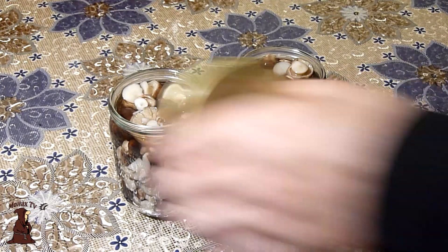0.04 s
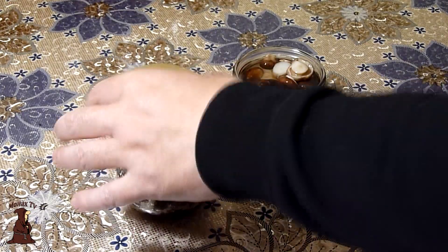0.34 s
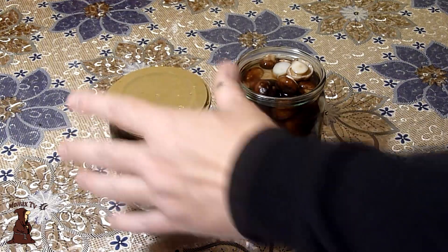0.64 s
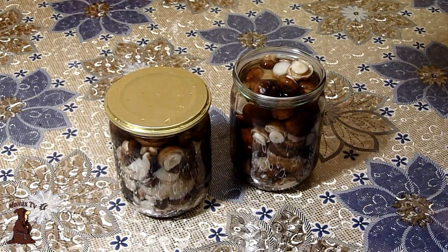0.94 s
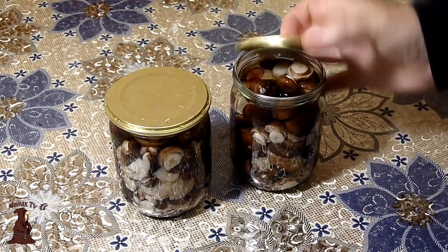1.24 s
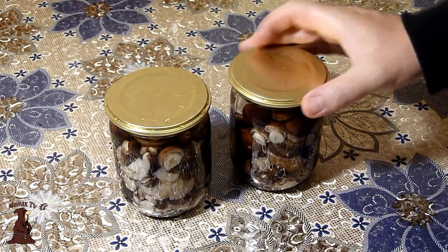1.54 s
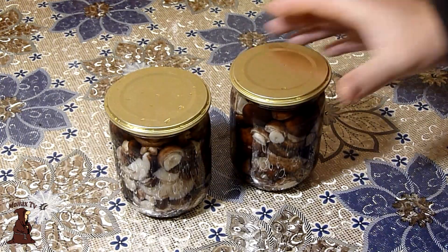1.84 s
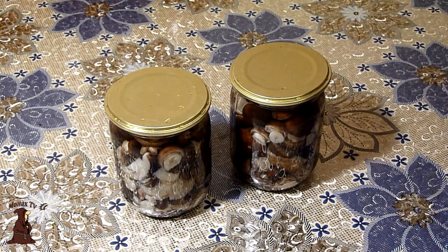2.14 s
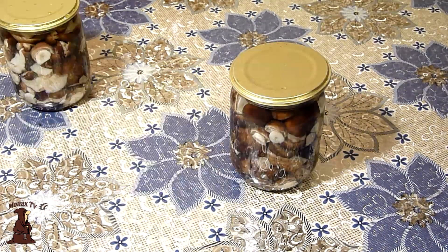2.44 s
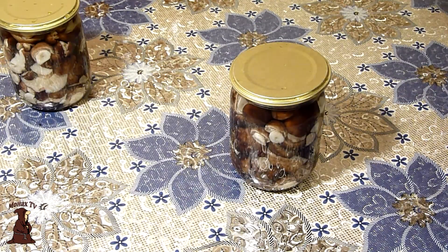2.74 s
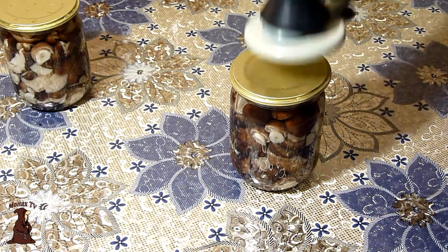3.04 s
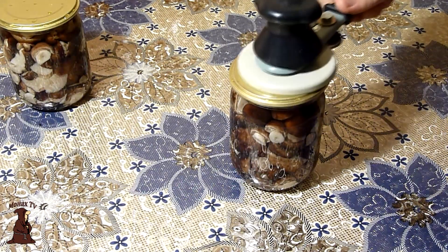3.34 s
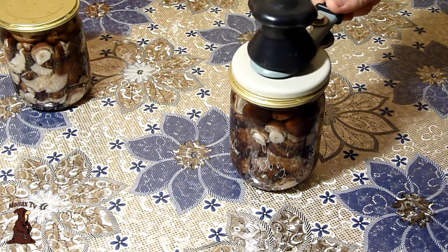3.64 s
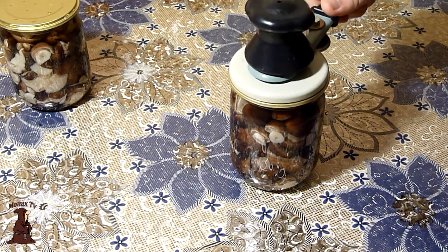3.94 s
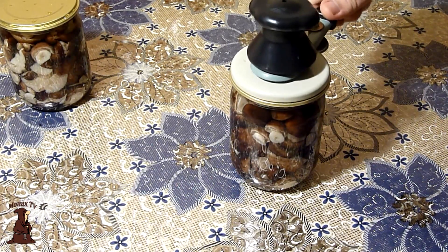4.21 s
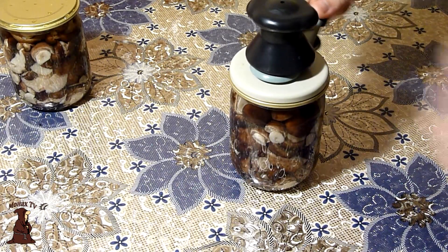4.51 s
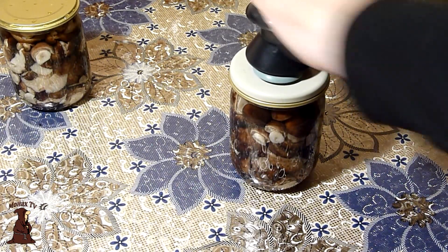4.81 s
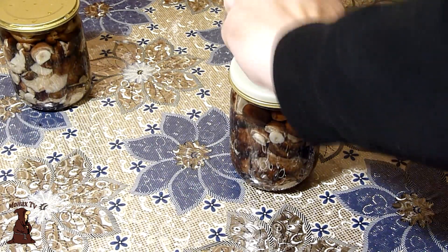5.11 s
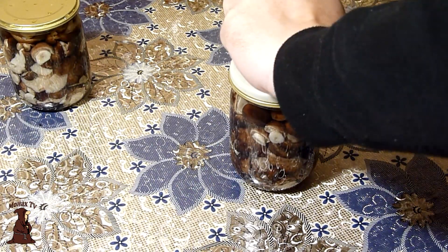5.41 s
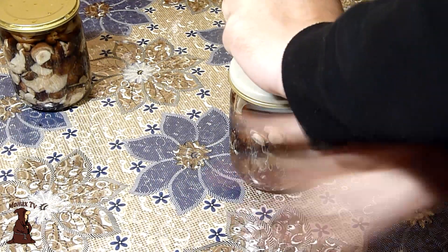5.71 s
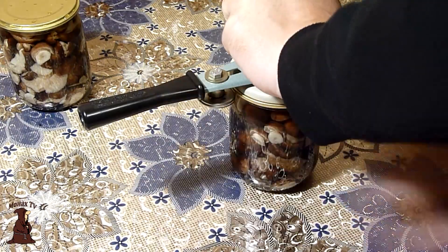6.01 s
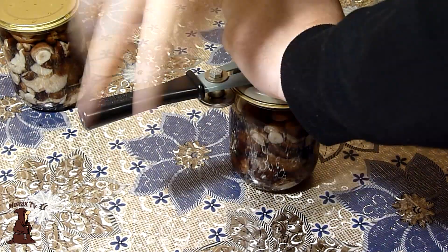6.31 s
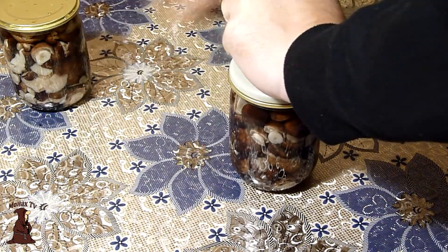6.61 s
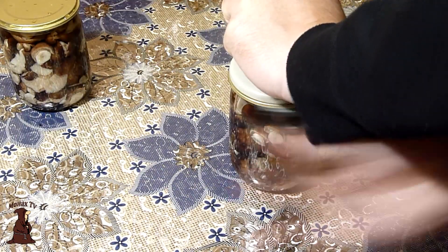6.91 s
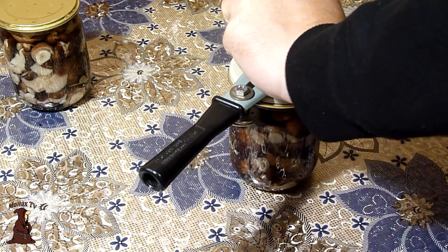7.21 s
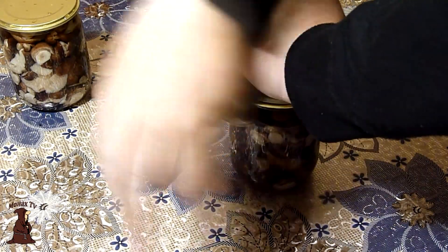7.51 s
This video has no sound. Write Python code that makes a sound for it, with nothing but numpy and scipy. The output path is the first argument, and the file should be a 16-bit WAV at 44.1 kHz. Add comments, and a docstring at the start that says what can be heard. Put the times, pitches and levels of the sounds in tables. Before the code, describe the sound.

A tin lid clangs onto a filled glass jar and is pressed home with a sharp ringing snap. A second lid clatters onto another jar, while hands and jars thump a cloth-covered table. A hand seamer clanks onto that lid, clicks as it is tightened, then rubs and scrapes quietly around the rim with a few clacks. The sounds are close, with a short kitchen echo over a soft steady hiss.

```python
"""Tin lids clang as they are dropped on two filled glass jars, one after the other, and pressed home.
A hand seamer, the tool that closes a lid's rim, is set on the second jar, tightened and cranked;
its roller rubs and clicks round the rim. Struck metal rings at its own tones; sliding parts hiss.
Hands and jars thump the cloth-covered table, and the small kitchen echoes over a soft steady hiss."""
import sys
import numpy as np
from scipy import signal
from scipy.fft import rfft, irfft, next_fast_len
from scipy.io import wavfile
from scipy.ndimage import uniform_filter1d

SR = 44100
rng = np.random.default_rng(int(sys.argv[2]) if len(sys.argv) > 2 else 0)


def file_out(sig):
    """Save sig as 16-bit WAV at sys.argv[1]."""
    # one column per channel
    cols = np.atleast_2d(sig).T
    # limit, then scale
    lim = np.clip(cols, -1, 1)
    pcm = np.round(lim * 32767).astype(np.int16)
    wavfile.write(sys.argv[1], SR, pcm)


N = 342216
BLOW_TIME = np.arange(SR // 2) / SR   # the half second that one blow is given


def from_db(db):
    """Turn decibels into a gain."""
    return 10 ** (np.asarray(db) / 20)


def rms_one(x):
    """Scale a sound to an average power of 1."""
    return x / np.sqrt(np.mean(x ** 2) + 1e-20)


def burst_one(x, size=220):
    """Scale a sound so that its loudest `size` samples have an average power of 1."""
    return x / np.sqrt(uniform_filter1d(x ** 2, size, mode="constant").max() + 1e-20)


def at_hz(points, hz):
    """Read a curve between its points, with octaves evenly spaced."""
    points = np.array(points)
    return np.interp(np.log(hz), np.log(points[:, 0]), points[:, 1])


def band(x, low, high, order=2):
    """Keep what lies between two frequencies."""
    return signal.sosfilt(signal.butter(order, [low, high], "band", fs=SR, output="sos"), x)


def dying(t60, t=BLOW_TIME):
    """A fade that loses 60 dB in t60 seconds, the ring time."""
    return np.exp(-np.log(1000) * t / t60)


def add(track, s, sound):
    """Mix a sound in at s seconds."""
    start = int(s * SR)
    track[start:start + len(sound)] += sound[:N - start]


def place(x, pan_db):
    """Share a sound between left and right; positive is to the left."""
    return x * from_db([[pan_db / 2], [-pan_db / 2]])


def spread(mid, side, width_db):
    """Make wide stereo: side is added to mid on the left and taken from it on the right."""
    return mid + from_db(width_db) * side * np.array([[1], [-1]])


def flutter(per_s):
    """A random wavering, about 1 in size."""
    return rms_one(np.interp(np.arange(N) / SR * per_s, np.arange(8000), rng.standard_normal(8000)))


def noise(spectrum, narrow_db):
    """Wide stereo noise with the given spectrum."""
    # stereo width of the air: f/Hz, side over mid/dB
    air_width = [(60, -8), (200, -4.5), (380, 0.5), (700, 3.5), (1290, 5), (2380, 4.5), (4400, 2),
                 (8120, 0), (15000, -3)]
    size = next_fast_len(N, real=True)
    hz = np.maximum(np.arange(size // 2 + 1) * SR / size, 1)
    inside = (hz > spectrum[0][0]) & (hz < spectrum[-1][0])
    mid, side = rfft(rng.standard_normal((2, size))) * from_db(at_hz(spectrum, hz)) * inside
    pair = irfft(spread(mid, side, at_hz(air_width, hz) - narrow_db), size)[:, :N]
    return pair / pair.mean(axis=0).std()


def room_air():
    """A soft steady hiss, strongest in the bass."""
    # spectrum of the hiss: f/Hz, level/dB
    spectrum = [(15, -53), (25, -9), (35, -15), (48, -8), (66, 2), (82, 0), (145, 1), (190, 1.5),
                (256, -1.5), (394, -1.5), (677, -5.5), (1190, -8.5), (2000, -13), (3820, -14.5),
                (16000, -23.5)]
    return from_db(-53.5) * noise(spectrum, narrow_db=-1.6)


def knock(hz, contact_s, cycles, rattle_db, width):
    """A padded blow: a short low tone with a rattle around it."""
    t = BLOW_TIME
    push = (1 - np.exp(-t / contact_s)) * dying(cycles / hz + 2 * contact_s)
    rattle = rms_one(band(rng.standard_normal(len(t)), hz / (1 + width), hz * (1 + width)))
    return burst_one(push * (np.sin(2 * np.pi * hz * t) + from_db(rattle_db) * rattle), size=660)


def table_thumps():
    """Hands and jars give short low knocks and set the table top booming."""
    # a hand leans or lands on the table, through jar and cloth: t/s, level/dB, f/Hz, boom/dB
    hand_thumps = [(.088, -51, 122, -56), (.385, -42.5, 126, -46), (1.076, -34, 128, -55),
                   (1.352, -34, 130, -45), (1.732, -37.5, 139, -41.5), (2.122, -36, 127.5, -41.5),
                   (2.903, -50.5, 200, -58.5), (3.888, -33.5, 166, -57), (5.871, -45.5, 270, -59.5),
                   (7.187, -36.5, 211, -49.5)]
    # a jolted jar knocks on its base: t/s, level/dB, f/Hz
    jar_knocks = [(.232, -41, 200), (.313, -42.5, 193), (0.497, -42, 308), (1.214, -32, 388),
                  (1.363, -38.5, 316), (1.419, -36, 460), (2.1, -42.5, 345), (2.63, -53.5, 256),
                  (3.243, -43.5, 355), (3.896, -37.5, 340), (4.059, -32.5, 369), (4.088, -38, 351),
                  (5.335, -46, 587), (6.434, -30.5, 366), (6.47, -33.5, 398), (7.52, -39, 354)]
    table_hz, ring_s, swell_s = 55.7, 0.86, 0.033
    knocks, booms, t = np.zeros(N), np.zeros(N), BLOW_TIME
    envelope = (1 - np.exp(-t / swell_s)) * dying(ring_s)
    boom = burst_one(np.sin(2 * np.pi * table_hz * t) * envelope, size=1800)
    for s, db, hz, boom_db in hand_thumps:
        add(knocks, s, from_db(db) * knock(hz, contact_s=0.01, cycles=9.1, rattle_db=-2.5, width=0.58))
        add(booms, s, from_db(boom_db) * boom)
    for s, db, hz in jar_knocks:
        jar = knock(hz, contact_s=0.0027, cycles=15.4, rattle_db=-4, width=0.44)
        table_thud = knock(hz=114.4, contact_s=0.01, cycles=13.4, rattle_db=-3, width=0.68)
        add(knocks, s, from_db(db) * (jar + from_db(-13.5) * table_thud))
        add(booms, s, from_db(db - 31) * boom)
    return from_db(-0.5) * knocks, from_db(-2) * booms


def strikes(contacts, tones, colour_db, crack_db, crack_hz, ring_db, split):
    """Struck metal sounds its own tones: briefly while the parts touch, then ringing freely."""
    # body, clang, bright and tick ranges, each with a level in colour_db: low f/Hz, high f/Hz
    ranges = [(250, 1000), (1000, 2500), (2500, 7000), (7000, 16000)]
    out, t = np.zeros(N), BLOW_TIME
    hz, tone_db, t60 = np.transpose(tones)
    # uneven support splits each tone into three close ones that beat
    triplets = hz * (1 + split * np.array([[-1], [0], [1]]) * rng.uniform(.5, 1.5, (3, len(hz))))
    waves = sum(np.sin(2 * np.pi * (f[:, None] * t + rng.random((len(f), 1)))) for f in triplets)
    t60 = np.minimum(t60, 2500 / hz)   # ring time is at most 2500 cycles
    free = waves * np.array([dying(ring_s) for ring_s in t60])
    grip = (hz[:, None] / 1500) ** .35   # touching stops high tones sooner
    octaves = np.log2(ranges).mean(axis=1) - np.log2(1580)
    for s, level_db, brightness, contact_s, free_db in contacts:
        age = np.minimum(t / contact_s, 20)
        shares = from_db(tone_db + 2 * rng.standard_normal(len(hz)))
        shares /= np.linalg.norm(shares)
        # the parts chatter, which fills the gaps between the tones
        crack = from_db(crack_db) * band(rng.standard_normal(len(t)), 420, crack_hz) * np.exp(-age)
        blow = shares @ (waves * np.exp(-age * grip) + from_db(free_db + ring_db) * free) + crack
        # a harder contact tilts the sound towards the treble
        range_db = level_db + np.array(colour_db) + brightness * octaves
        for db, edges in zip(range_db, ranges):
            add(out, s, from_db(db) * burst_one(band(blow, *edges, order=5)))
    return out


def first_lid():
    """A tin lid bounces loose on the glass, then rings at other tones as it is pressed home."""
    # lid meets jar: t/s, level/dB, brightness/(dB per octave), contact time/s, free ring/dB
    drops = [(0.2305, -17, -0.2, 0.0082, -8), (0.2367, -18.5, 2, 0.018, 2),
             (0.311, -23.5, -0.5, 0.0083, -23), (0.3168, -15.5, -1, 0.0098, -37),
             (0.3215, -21.5, -1, 0.0087, -39)]
    presses = [(0.427, -21, -1.5, 0.0063, -34), (0.4625, -44, -1, .005, -19),
               (0.4963, -10, -0.04, 0.0063, -20), (0.592, -42, 7.5, 0.013, -5), (0.673, -59, 8, .003, -22)]
    # the lid's tones, loose and seated on the jar: f/Hz, level/dB, ring time/s
    loose = [(479, -18.5, 0.22), (761, -11, 0.32), (1474, 5.5, 0.2), (1557, 6.5, 0.21), (1846, -10, 0.41),
             (2030, -5.5, 0.39), (2300, -24, 0.35), (2220, 0, 0.15), (3060, -8, 0.15), (3280, 1, 0.045),
             (3526, -6, 0.12), (4270, -16, 0.16), (3970, -7, 0.28), (4410, -7.5, 0.34), (5350, -14.5, 0.25),
             (5600, -32, 0.18), (7400, -19, 0.33), (9600, -21, 0.16), (11300, -14.5, 0.17),
             (13900, -16, 0.14)]
    seated = [(498, -9, 0.61), (567, -10, 0.49), (742, -9, 0.51), (1090, -9.5, .45), (1208, -5, 0.52),
              (1517, -7.5, 0.24), (1552, 3, 0.28), (2955, -6, .29), (3260, -7.5, .28), (4470, -8.5, .25),
              (4570, -17, .22), (5800, -11, .17), (7660, -17, 0.12), (9540, -13, .1), (11200, -12, .09)]
    dropped = strikes(drops, loose, colour_db=(-9, 0, -4.5, -14),
                      crack_db=-4, crack_hz=12100, ring_db=2, split=0.0091)
    pressed = strikes(presses, seated, colour_db=(-5.5, -1.5, -10.5, -17.5),
                      crack_db=-14.5, crack_hz=11100, ring_db=-17, split=0.0044)
    return from_db(1) * dropped + from_db(-1.26) * pressed


def sliding(slides, width, grain_db, slips_per_s):
    """Dry, hard surfaces slide: swells of grainy hiss in a band whose width is a share of the pitch."""
    out, t = np.zeros(N), BLOW_TIME
    for s, half_s, hz, db in slides:
        hiss = rms_one(band(rng.standard_normal(len(t)), hz * (1 - width / 2), hz * (1 + width / 2)))
        swell = np.exp(-((t - t.mean()) / half_s) ** 2 / 2)
        add(out, s - t.mean(), from_db(db) * hiss * swell)
    return out * from_db(grain_db * flutter(slips_per_s))


def lid_scrapes():
    """The lids and the seamer's chuck, the part that grips a lid, scrape briefly."""
    # scrapes: middle t/s, half length/s, f/Hz, level/dB
    slides = [(.275, 0.02, 3770, -31), (.40, 0.034, 11300, -48), (1.235, 0.01, 5470, -34.5),
              (1.50, .03, 12000, -50.5), (1.72, 0.012, 10500, -52), (3.31, 0.075, 11900, -58.5),
              (5.034, 0.028, 6050, -52), (5.038, 0.03, 12700, -56), (5.50, 0.012, 13700, -52)]
    return from_db(-0.5) * sliding(slides, width=0.66, grain_db=2.5, slips_per_s=620)


def second_lid():
    """The other lid clatters onto its jar and is knocked once it is seated."""
    # lid meets jar: t/s, level/dB, brightness/(dB per octave), contact time/s, free ring/dB
    drops = [(1.1542, -17.5, -5, 0.0072, -11), (1.2132, -19, 2.5, 0.0072, -7), (1.255, -35.5, 5, .007, -29),
             (1.344, -42.5, 6, .005, -29), (1.4182, -31.5, 0, .0035, -36), (1.4788, -46, 6, .005, -32),
             (1.518, -45.5, -4, .0043, -21), (1.5752, -47, 5, 0.0018, -34), (1.662, -45, 0, 0.0017, -20)]
    knocks = [(1.712, -46, -7, 0.007, 4), (1.725, -35.5, -6.5, .009, -3), (2.497, -50, 4, .0055, -12),
              (3.213, -26, 0.7, 0.0046, 2.5), (3.2255, -28.5, -0.5, .012, -21),
              (3.241, -27.5, -1.5, 0.0034, -29), (3.306, -47, 4, 0.0068, -16),
              (3.507, -53.5, 6.5, .0035, -14)]
    # the lid's tones, loose and seated on the jar: f/Hz, level/dB, ring time/s
    loose = [(408, -14, 0.15), (687, -3.5, 0.13), (764, 3, 0.31), (822, 5, 0.26), (1245, 3, 0.25),
             (1520, -3, 0.099), (1601, -5.5, 0.5), (2006, -3.5, 0.57), (2288, 1.5, 0.24), (2440, -12, .33),
             (2947, -0.5, 0.22), (3288, -1.5, 0.24), (4260, -15, 0.17), (4510, -1.5, 0.19),
             (4530, -6, 0.098), (5280, -8, 0.078), (5420, -8.5, 0.17), (5670, -14, .18), (6820, -9, 0.094),
             (8140, -8, .13), (9270, -7, 0.12), (11600, -4, .13), (12300, -17, .13)]
    seated = [(426, -25, .3), (735, -19, 0.16), (1414, 3, 0.26), (1430, -7, 0.23), (1550, 2, 0.076),
              (1830, -8, 0.22), (2046, 1, 0.048), (2240, -13, 0.23), (2890, -12, 0.42), (3780, -6, 0.073),
              (4930, -10.5, 0.38), (6000, -24, .17), (9200, -14, 0.27), (11100, -14, .18)]
    dropped = strikes(drops, loose, colour_db=(-8, 0, -5.5, -11.5),
                      crack_db=-1.5, crack_hz=13800, ring_db=1.5, split=0.0044)
    knocked = strikes(knocks, seated, colour_db=(-12, -1, -10, -17),
                      crack_db=-8, crack_hz=13200, ring_db=-10, split=0.0087)
    return from_db(1.05) * dropped + from_db(-0.1) * knocked


def squeaks():
    """Glass and screw slip with a hiss so narrow that it is a thin squeak."""
    # squeaks: middle t/s, half length/s, f/Hz, level/dB
    slides = [(2.515, 0.022, 9260, -62.5), (5.09, 0.1, 2186, -66.5)]
    return sliding(slides, width=0.038, grain_db=6, slips_per_s=300)


def seamer_clicks():
    """The seamer's head clicks as it is set on the lid and tightened."""
    # clicks: t/s, level/dB, brightness/(dB per octave), contact time/s, free ring/dB
    clicks = [(3.8818, -27, 0.6, .005, -27), (3.894, -33, -2, 0.011, -14), (4.0574, -44, -3.5, 0.01, -22),
              (4.0845, -53, 9, .0067, -29), (4.1443, -55, 6.5, 0.0065, -29), (4.594, -60, 2.5, 0.0083, -8),
              (5.103, -56, 4, .004, -18), (5.457, -57, 3.5, .0032, -21)]
    # the head's tones: f/Hz, level/dB, ring time/s
    tones = [(363, 4, 0.094), (705, 0, 0.14), (1270, 4, 0.2), (1679, 5.5, .18), (2150, -25, .12),
             (2600, -2, .12), (3200, 5, .11), (4900, 8, .1), (5500, 1, .1), (6160, -7, .07), (7500, 1, .09),
             (8400, 0, .09), (11100, -17, .07), (13400, -11, .05), (14600, -13, .05)]
    return strikes(clicks, tones, colour_db=(-5.5, 0, -2, -7.5),
                   crack_db=8, crack_hz=16400, ring_db=-4, split=0.011)


def stroke(start, end, rise_s=0.11, fall_s=0.12):
    """One push of the hand: it builds up, holds from start to end and lets go."""
    t = np.arange(N) / SR
    return np.clip(np.minimum(1 + (t - start) / rise_s, 1 + (end - t) / fall_s), 0, 1)


def friction(level, spectrum, grain_db, slips_per_s):
    """Rubbing noise, roughened by small slips."""
    return level * noise(spectrum, narrow_db=12) * rms_one(from_db(grain_db * flutter(slips_per_s)))


def roller():
    """With each stroke the roller grumbles through the jar and scrapes along the tin rim."""
    # two strokes on the screw, then two on the crank: start t/s, end t/s, rub/dB, scrape/dB
    strokes = [(4.19, 5.503, -52, -68), (5.544, 5.765, -50, -56), (5.9, 7.3, -62, -68),
               (7.4, 7.67, -54.5, -70)]
    # spectra of the low rub, the rim scrape and a fine rasp: f/Hz, level/dB
    rub_spectrum = [(41, -60), (70, -6.5), (188, 2), (222, 2), (331, 0), (371, 2), (554, -10), (807, -26),
                    (1120, -8.5), (1400, -40), (1820, -42), (3080, -120)]
    scrape_spectrum = [(1200, -13), (1800, 0.5), (2200, 7.5), (2800, -5), (3800, -1.5), (5500, -6),
                       (7000, -10), (9000, -9)]
    rasp_spectrum = [(4000, -17), (6500, -6), (9000, 1), (13500, -4), (16000, -21)]
    starts, ends, rub_db, scrape_db = np.transpose(strokes)
    pushes = np.array([stroke(start, end) for start, end in zip(starts, ends)])
    rub_level = (from_db(rub_db)[:, None] * pushes).max(axis=0)
    scrape_level = (from_db(scrape_db)[:, None] * pushes).max(axis=0)
    rub = friction(rub_level, rub_spectrum, grain_db=1.5, slips_per_s=40)
    scrape = friction(scrape_level, scrape_spectrum, grain_db=0.5, slips_per_s=320)
    rasp = friction(from_db(-70) * pushes.max(axis=0), rasp_spectrum, grain_db=2, slips_per_s=130)
    return rub + scrape + rasp


def crank_clacks():
    """The crank clacks as it is turned and rings only briefly."""
    # clacks: t/s, level/dB, brightness/(dB per octave), contact time/s, free ring/dB
    clacks = [(5.87, -40.5, -5, 0.0037, -18), (5.895, -39.5, -0.5, 0.013, -28),
              (6.4345, -41, 3, 0.0084, -23), (7.5222, -41, -0.4, 0.0041, -1)]
    # the crank's tones: f/Hz, level/dB, ring time/s
    tones = [(326, -3, .09), (400, -11, 0.076), (477, 1, 0.089), (1186, -2.5, 0.087), (1750, 0.5, 0.1),
             (3453, 4.5, 0.058), (3855, 2, 0.025), (4150, -5, .05), (4740, 4, .06), (5410, 3, 0.046),
             (6600, -17, .05), (7670, -3.5, .05), (9220, 2.5, .05), (11300, -4, .04)]
    return from_db(-1) * strikes(clacks, tones, colour_db=(-5.5, -0.5, 5.5, 0.5),
                                 crack_db=7, crack_hz=8060, ring_db=-3, split=0.016)


def kitchen(x, first_echo_s, build_s):
    """The walls send back dense echoes; each band dies away at its own speed."""
    # how long the room rings: f/Hz, ring time/s
    ring_times = [(100, .5), (400, 0.51), (1400, 0.56), (4000, 0.28), (9000, 0.33), (15000, 0.86)]
    # strength of the echoes: f/Hz, level/dB
    levels = [(100, 5), (400, 0), (1400, -5.5), (4000, -7), (9000, -8), (15000, -12)]
    # stereo width of the echoes: f/Hz, side over mid/dB
    widths = [(100, -26), (400, -19), (1400, -13), (4000, -8), (14000, -0.5)]
    t = np.arange(int(SR * .7)) / SR
    edges = np.geomspace(70, 17000, 13)
    onset = 1 - np.exp(-np.maximum(t - first_echo_s, 0) / build_s)
    response = 0
    for low, high in zip(edges, edges[1:]):
        hz = np.sqrt(low * high)
        tail = onset * dying(at_hz(ring_times, hz), t)
        echoes = spread(*band(rng.standard_normal((2, len(t))), low, high), at_hz(widths, hz))
        response = response + from_db(at_hz(levels, hz)) * echoes * tail / np.linalg.norm(tail)
    return signal.fftconvolve(x[None], response, axes=1)[:, :N]


def microphones(pair, dip_hz, dip_q, dip_share):
    """The bounce off the table top weakens a narrow band; a close microphone pair widens the sound."""
    # how far the left channel runs ahead of the right: f/Hz, phase/radians
    left_lead = [(40, .03), (300, 0.21), (700, 0.39), (1000, 0.54), (3200, 0.74), (4500, 0.68), (7400, 0.7),
                 (15000, 0.47)]
    left, right = pair - dip_share * signal.lfilter(*signal.iirpeak(dip_hz, dip_q, fs=SR), pair)
    size = next_fast_len(N, real=True)
    hz = np.maximum(np.arange(size // 2 + 1) * SR / size, 1)
    lag = np.exp(-1j * at_hz(left_lead, hz))
    return np.array([left, irfft(rfft(right, size) * lag, size)[:N]])


def scene():
    """Lids, seamer and table in the kitchen, over a soft steady hiss."""
    first, second = first_lid(), second_lid()
    handling = seamer_clicks() + crank_clacks() + lid_scrapes() + squeaks()
    knocks, booms = table_thumps()
    direct = place(first, pan_db=-0.5) + place(second, pan_db=-3)
    direct += place(handling, pan_db=-1.5) + place(knocks + booms, pan_db=1.7)
    to_walls = first + second + from_db(0.5) * handling + from_db(-2) * knocks
    echoes = kitchen(to_walls, first_echo_s=0.0018, build_s=0.0007)
    clatter = microphones(direct + echoes, dip_hz=973, dip_q=2.94, dip_share=0.68)
    return from_db(-0.07) * clatter + roller() + room_air()


def record(dry):
    """The highest treble is cut off steeply."""
    cutoff_hz = 15900
    return signal.sosfilt(signal.ellip(10, .2, 80, cutoff_hz, fs=SR, output="sos"), dry)


dry = scene()
out = record(dry)
file_out(out)
```